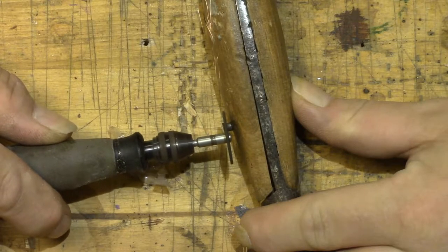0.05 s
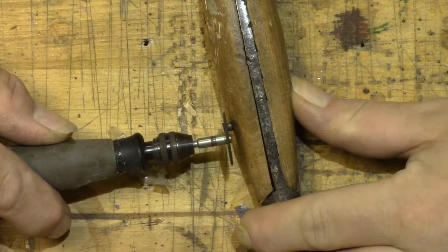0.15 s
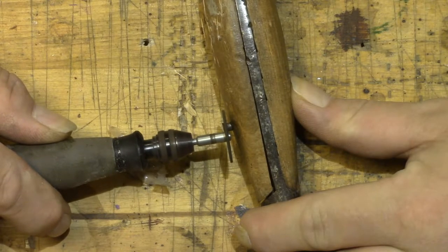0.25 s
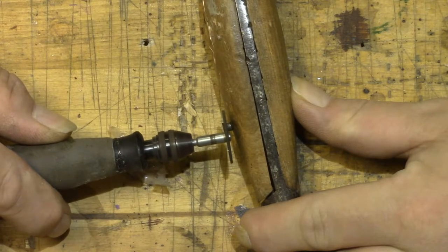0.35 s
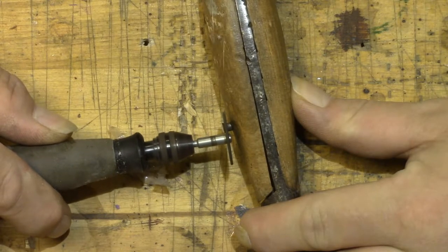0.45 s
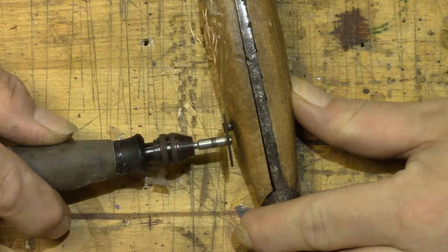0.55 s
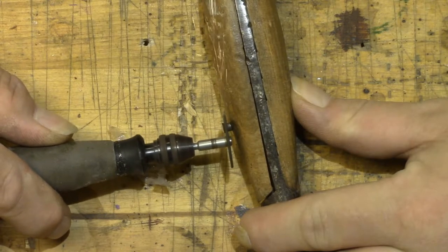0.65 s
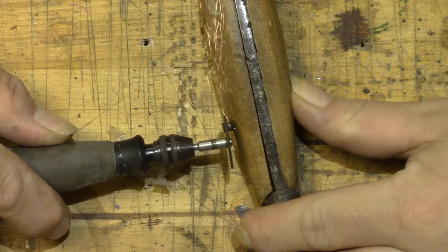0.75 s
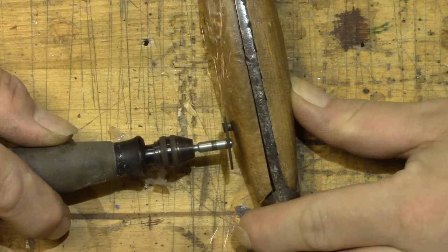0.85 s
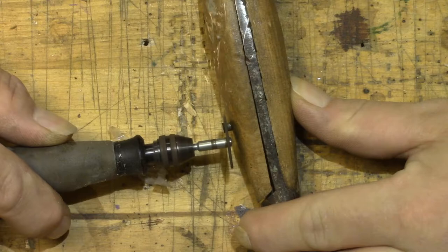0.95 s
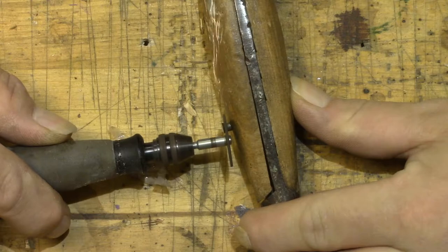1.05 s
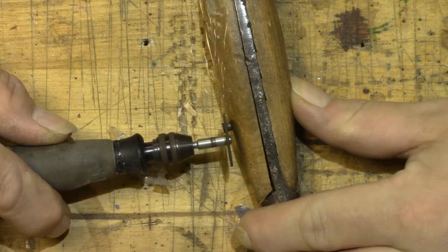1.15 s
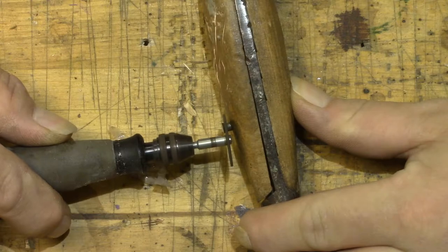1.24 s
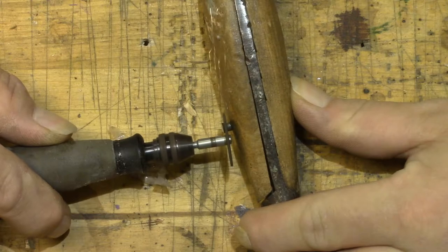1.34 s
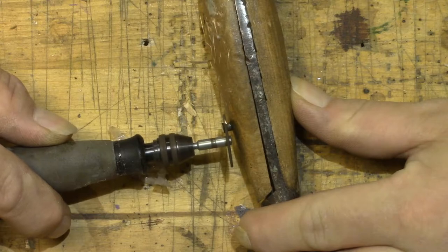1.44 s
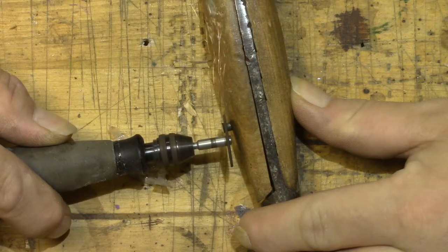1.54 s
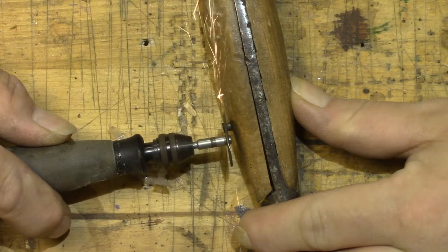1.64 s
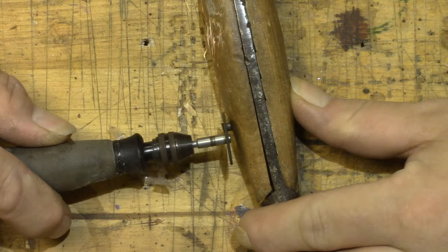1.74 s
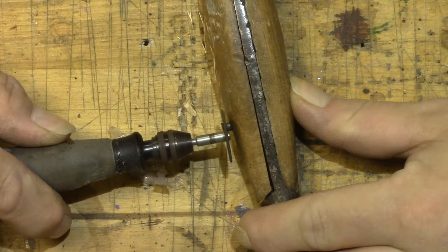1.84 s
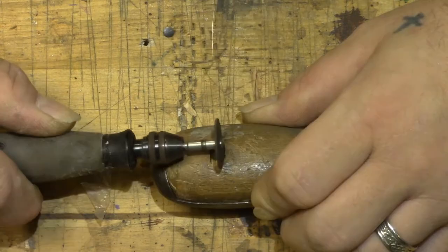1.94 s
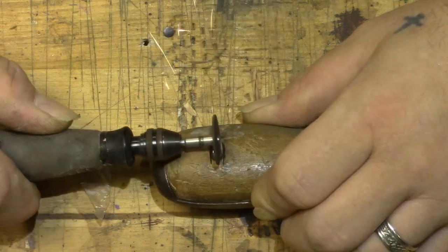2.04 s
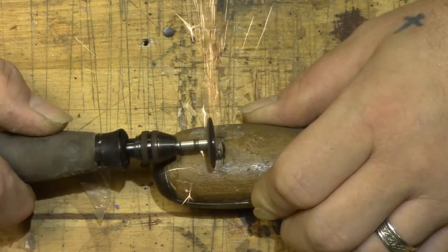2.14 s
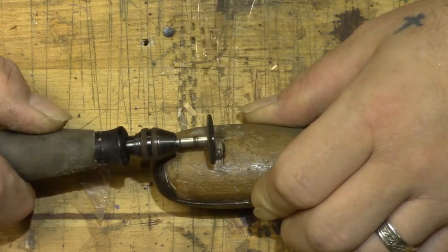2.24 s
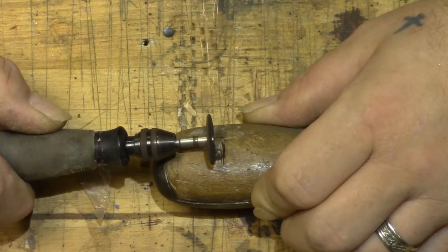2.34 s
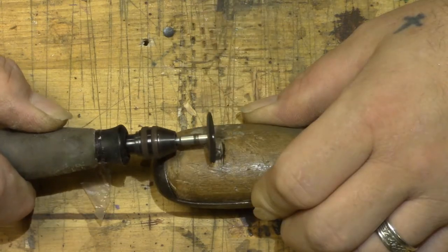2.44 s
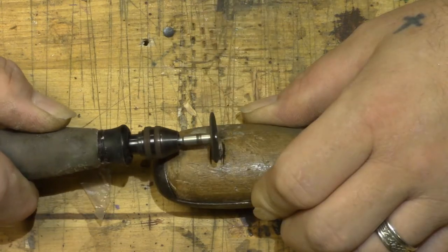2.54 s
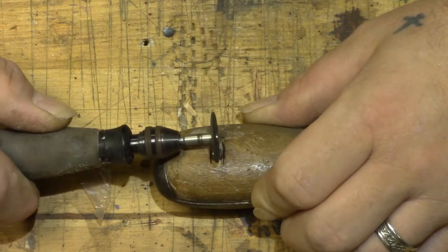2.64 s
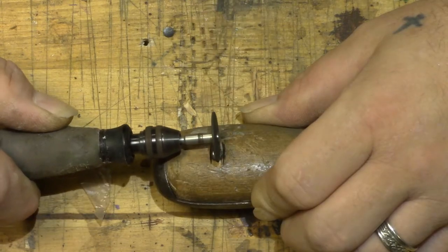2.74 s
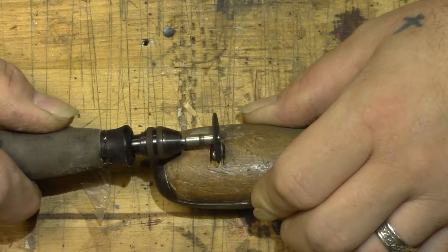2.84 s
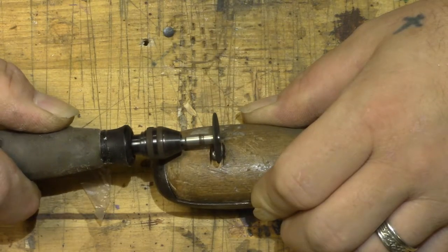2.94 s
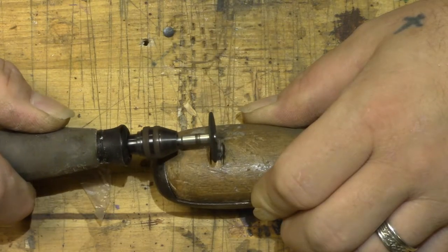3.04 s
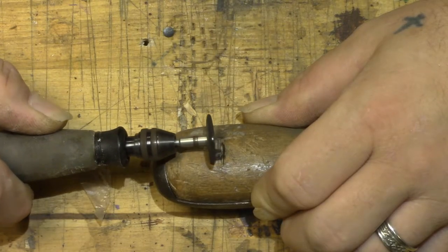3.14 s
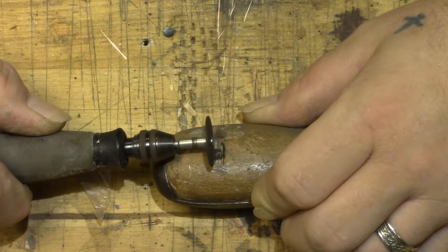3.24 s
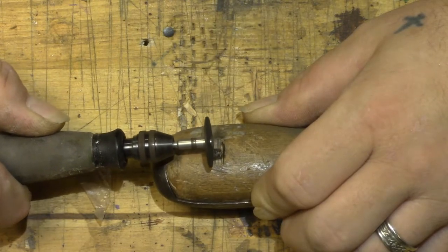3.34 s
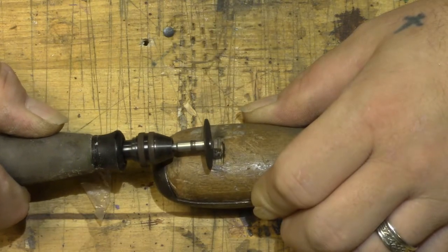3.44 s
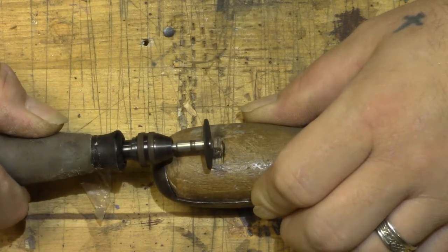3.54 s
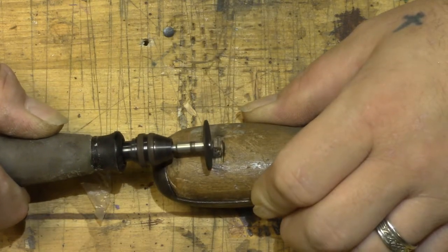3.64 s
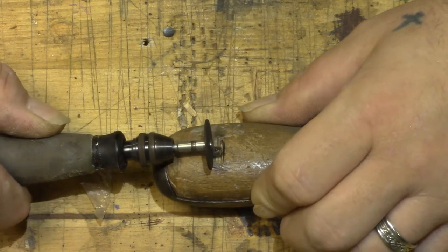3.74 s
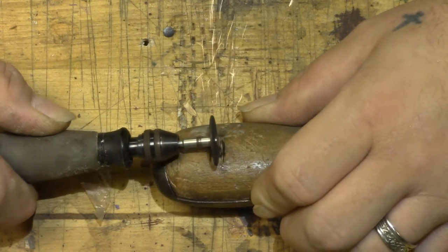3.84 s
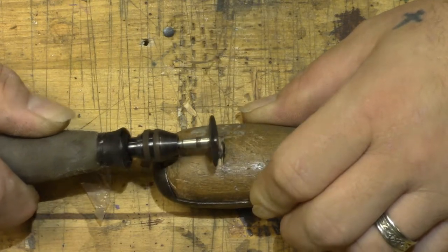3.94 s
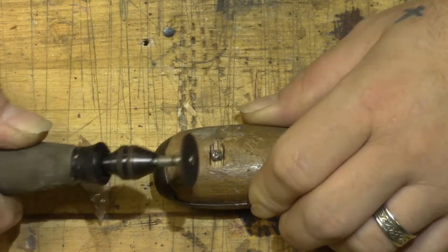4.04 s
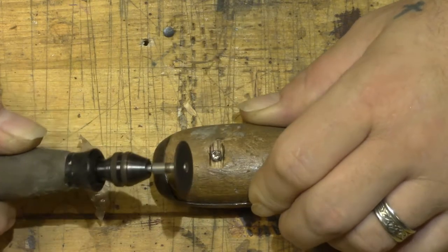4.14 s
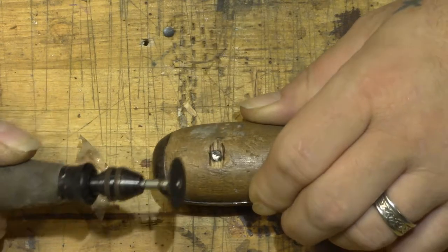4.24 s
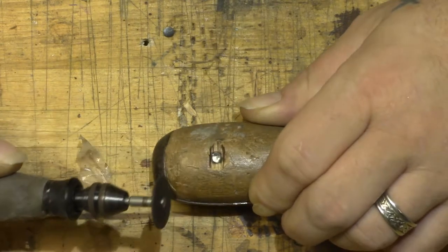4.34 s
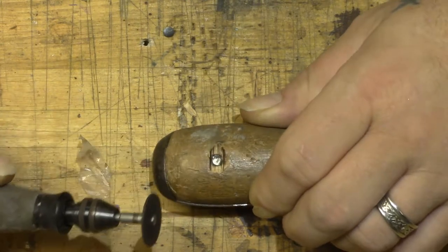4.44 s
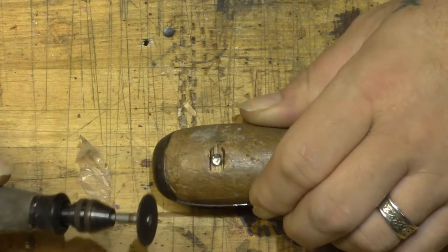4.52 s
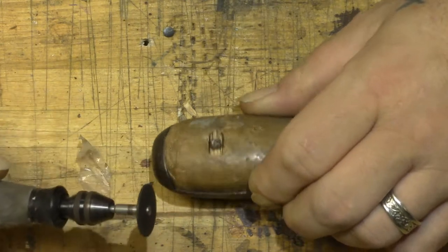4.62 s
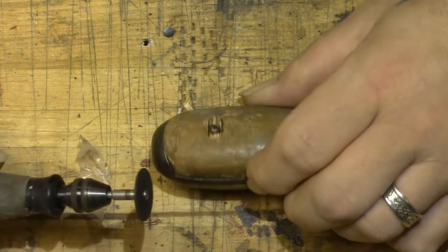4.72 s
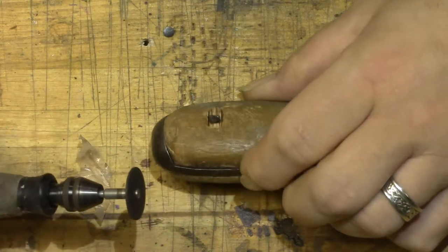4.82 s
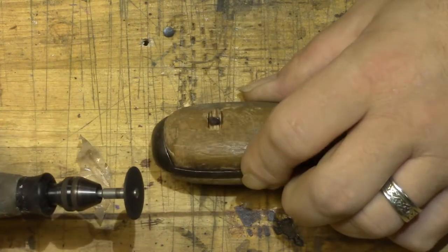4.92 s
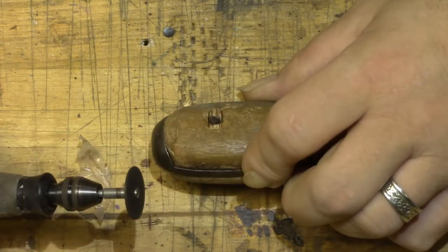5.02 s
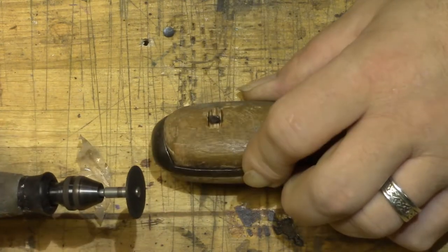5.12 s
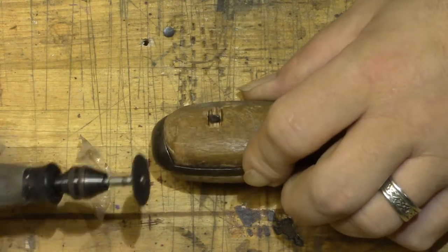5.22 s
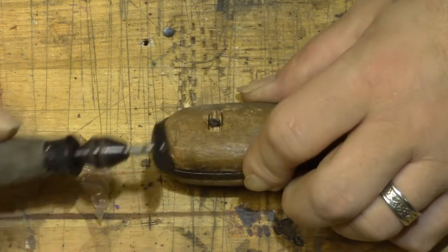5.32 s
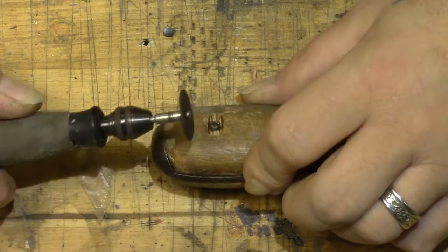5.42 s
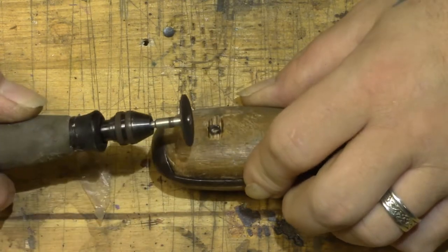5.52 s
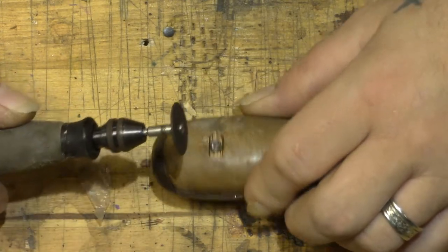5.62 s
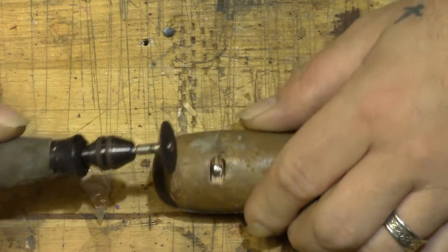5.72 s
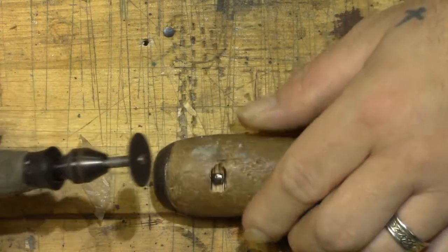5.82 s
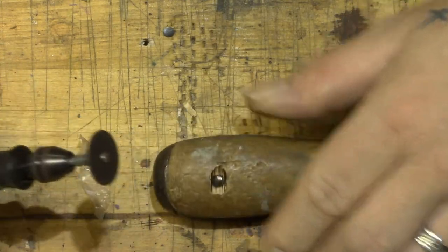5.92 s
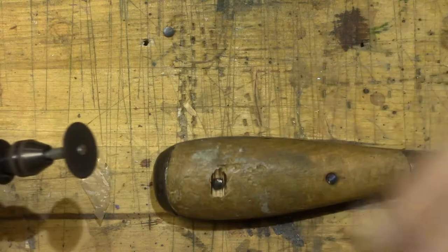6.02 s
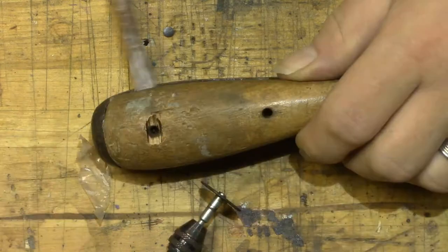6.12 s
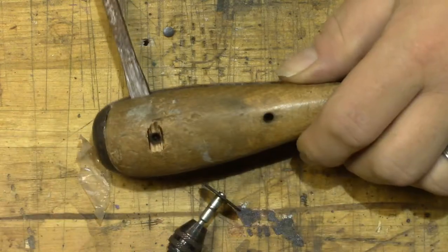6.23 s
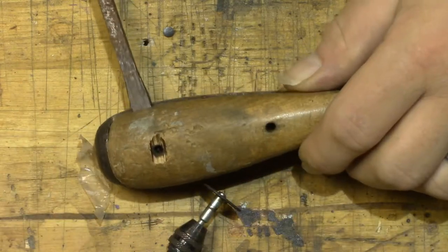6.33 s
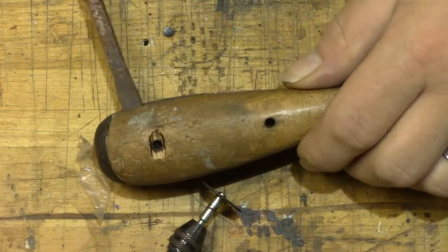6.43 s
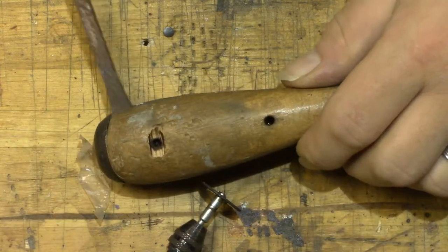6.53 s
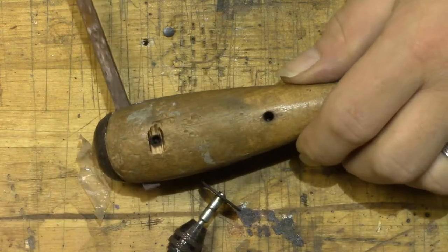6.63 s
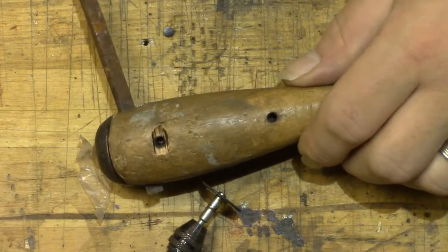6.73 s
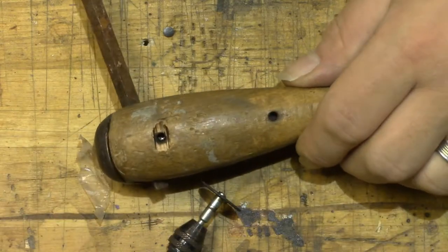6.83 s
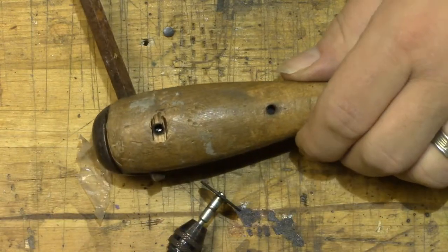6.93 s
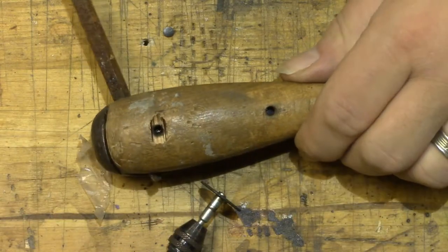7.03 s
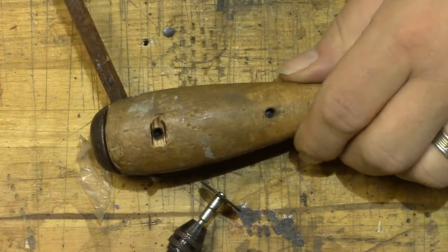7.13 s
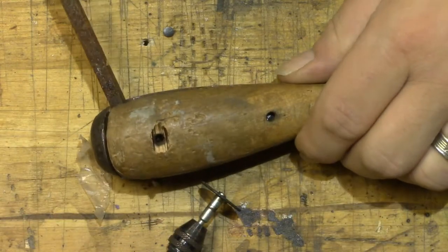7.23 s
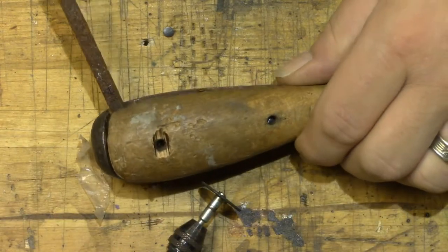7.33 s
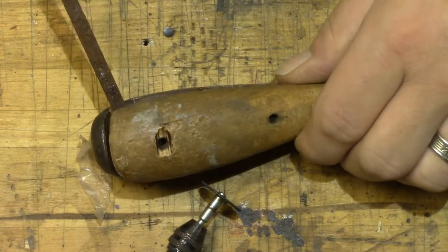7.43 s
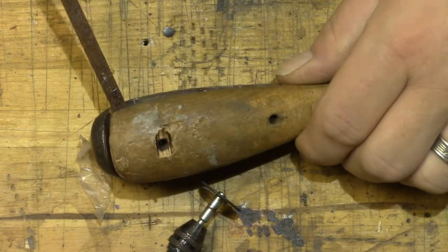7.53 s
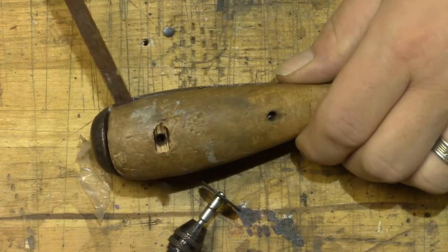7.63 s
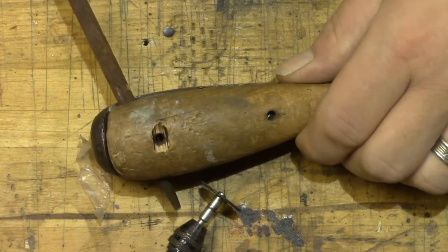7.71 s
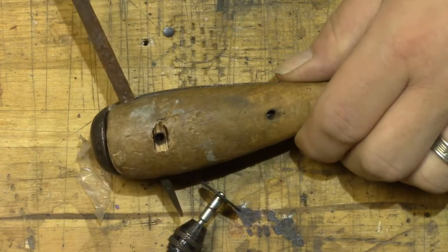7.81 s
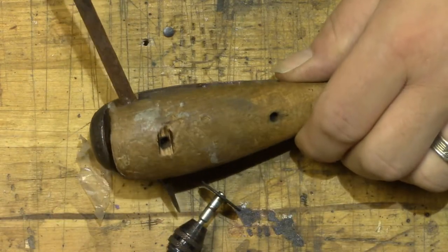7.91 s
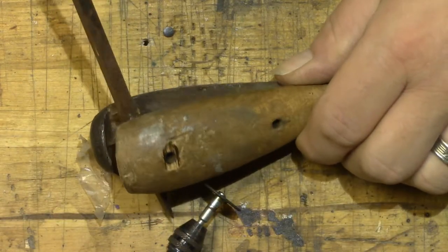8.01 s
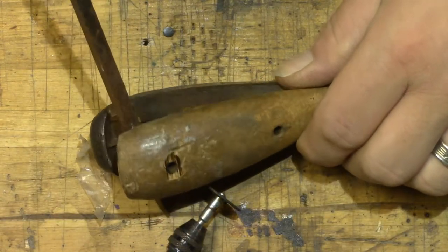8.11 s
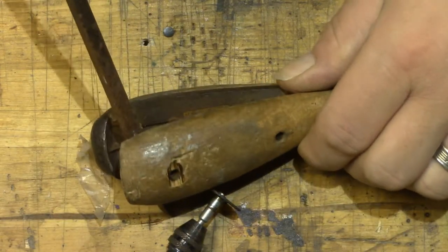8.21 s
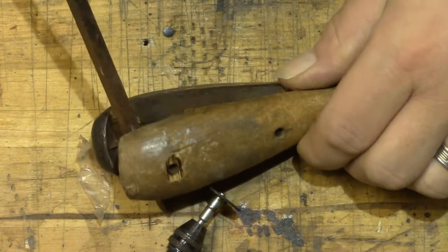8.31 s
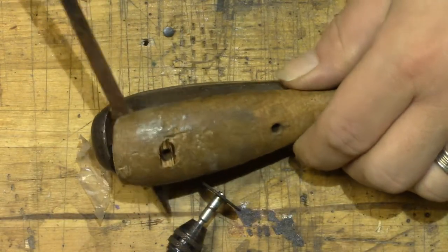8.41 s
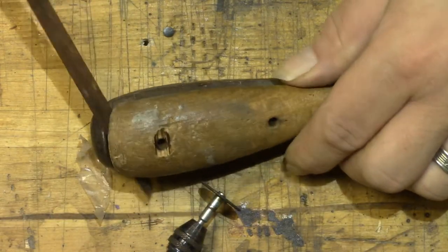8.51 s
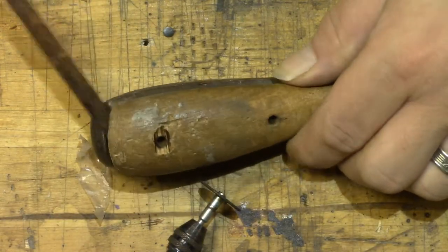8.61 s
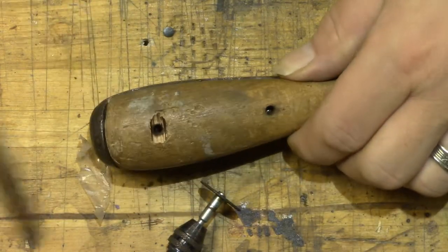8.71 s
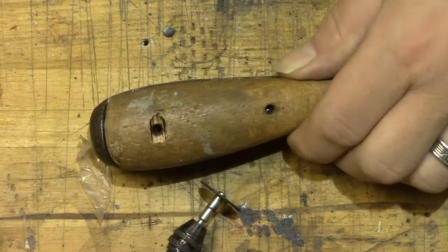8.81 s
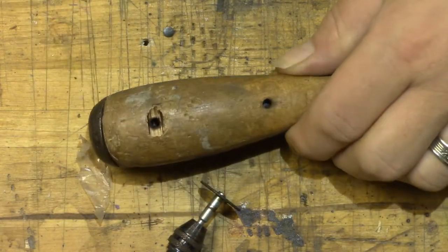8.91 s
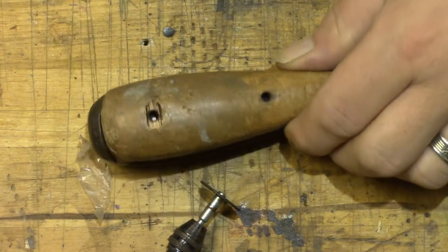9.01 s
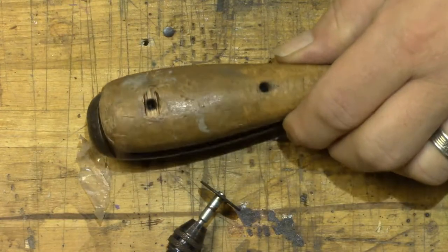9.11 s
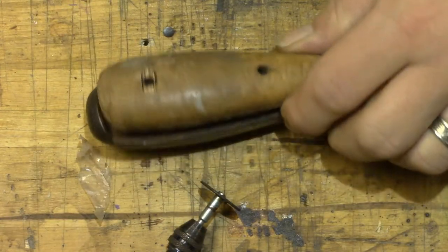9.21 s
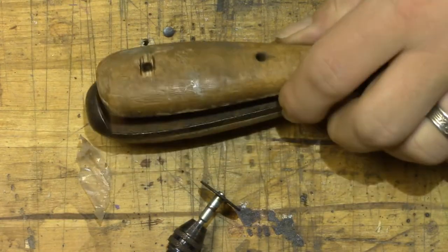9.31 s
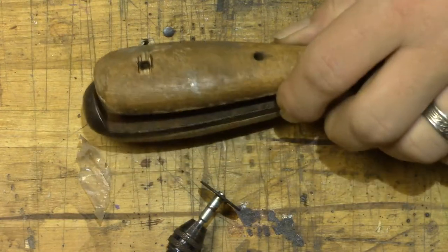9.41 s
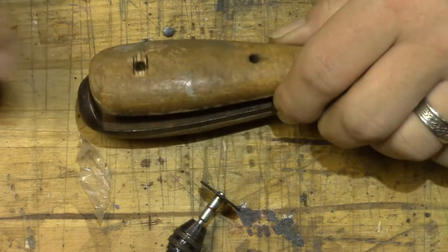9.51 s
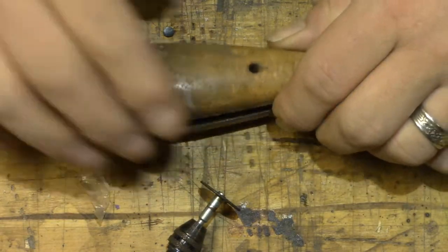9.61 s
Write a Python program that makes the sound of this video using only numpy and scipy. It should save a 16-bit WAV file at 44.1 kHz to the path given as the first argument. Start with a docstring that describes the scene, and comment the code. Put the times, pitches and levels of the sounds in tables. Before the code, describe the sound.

A small rotary tool whines and hisses as it grinds two steel pins, spins free, stops, then woody knocks and metal scrapes follow.

```python
"""A quiet workshop with a wooden bench: a small rotary tool grinds through two steel pins in a wooden handle.
It is lifted, spins free and stops short; then a steel bar pries, scrapes and knocks at the handle.
The tool is built from multiples of its shaft speed plus hissing grit and fan air.
The handling is noisy contact force that sets bench, handle and bar ringing. The sound is the same in both channels."""
import sys
import numpy as np
from scipy import signal
from scipy.fft import rfft, irfft
from scipy.io import wavfile

SR = 44100
rng = np.random.default_rng(int(sys.argv[2]) if len(sys.argv) > 2 else 0)


def master(y):
    """Save y as 16-bit WAV."""
    cut = np.clip(np.atleast_2d(y).T, -1, 1)
    pcm = np.round(cut * 32767)  # scale
    wavfile.write(sys.argv[1], SR, pcm.astype(np.int16))


def volts_from_decibels(level):
    """Turn decibel levels (scalar or array-like) into linear amplitude factors."""
    exponent = np.asarray(level, float) / 20
    return 10 ** exponent


N = 426006      # length in samples
STOP_S = 6.065  # the tool falls silent and the handling begins

# once-a-turn hum of the shaft, wavering with the grip: start_s [s], level_db [dB]
HUM = [(0, -51), (.15, -56), (.39, -43), (.48, -52.5), (.6, -44), (.9, -44), (1.15, -51.5), (1.78, -46),
       (1.98, -35.5), (2.1, -49), (2.21, -35.5), (2.35, -43.5), (2.8, -36.5), (3.22, -54.5), (3.6, -39.5),
       (3.85, -52.5), (4.5, -39.5), (4.95, -51.5), (6.06, -46)]
# ringing tones of the bench, the wooden handle and the steel bar:
# pitch_hz [Hz], relative level_db [dB], time to fall by 60 dB t60_s [s]
BENCH = [(248, -3, 0.078), (270, -13, 0.1), (335, -4, 0.062), (400, 7, 0.038), (470, -3.5, 0.027)]
WOOD = [(566, -2.5, 0.015), (658, -3.5, 0.033), (873, -3, 0.022), (1061, -1, 0.024), (1353, 2.5, 0.015),
        (1847, -7.5, 0.039), (2093, 0.5, 0.014), (2604, -27, 0.026)]
STEEL = [(3650, -9, .06), (3950, -8, .05), (4450, -1, .05), (4620, -4, .05), (4786, -1, .09),
         (5950, -12, .06), (6640, -13, .06), (7950, -15, .05), (8950, -11, .07), (10800, -18, .05),
         (14150, -19, .08)]


def rms_one(x):
    """Scale to unit power."""
    return x / np.sqrt(np.mean(x ** 2) + 1e-20)


def in_time(rows, at):
    """Columns of a table at the given samples, joined by straight lines."""
    s, *columns = np.transpose(rows)
    return [np.interp(at / SR, s, c) for c in columns]


def drift(rate_hz, size):
    """Random wandering of spread 1: noise with everything much faster than rate_hz smoothed away."""
    r = np.exp(-128 * np.pi * rate_hz / SR)   # one value every 64 samples
    noise = rng.standard_normal(size // 64 + 502)
    slow = signal.lfilter([1], [1, -2 * r, r * r], noise)[500:]   # skip the filter's start
    return np.interp(np.arange(size) / 64, np.arange(len(slow)), rms_one(slow - slow.mean()))


def band(x, low_hz, high_hz, order=2):
    """Keep only the sound between two pitches."""
    return signal.sosfilt(signal.butter(order, [low_hz, high_hz], "band", fs=SR, output="sos"), x)


def coloured(spectrum, size):
    """Noise of the given spectrum, unit power."""
    hz, db = np.transpose(spectrum)
    bins = np.maximum(np.fft.rfftfreq(size, 1 / SR), 1)
    gain = volts_from_decibels(np.interp(np.log(bins), np.log(hz), db))
    return rms_one(irfft(rfft(rng.standard_normal(size)) * gain, size))


def resonate(x, hz, width_hz):
    """One resonance, with gain 1 at its peak."""
    r = np.exp(-np.pi * width_hz / SR)
    poles = [1, -2 * r * np.cos(2 * np.pi * hz / SR), r * r]
    return signal.lfilter(np.array([1, 0, -1]) * (1 - r * r) / 2, poles, x)


def swell(start, length, rise, fall, at):
    """Rise, hold and fall of one event, 0-1 (times in s)."""
    t = at / SR - start
    return np.clip(t / rise, 0, 1) * np.clip((length + fall - t) / fall, 0, 1) ** 2


def motor():
    """Fan air rushes all along; whistle and motor tones stand out once the wheel is free."""
    # fan whistle: start_s [s], level_db [dB]
    whistle = [(3.97, -42), (4.15, -37.5), (4.22, -28), (4.6, -29.5), (4.75, -42), (5.2, -32.5), (5.4, -41),
               (5.65, -42.5), (6.06, -71)]
    # free-running motor and bearings: multiple of shaft speed [ratio], level_db [dB rms]
    motor_tones = [(1.25, -64), (2, -46), (2.999, -42.5), (4.09, -48), (7.19, -50), (8.27, -52.5)]
    # colour of the fan air: pitch_hz [Hz], relative level_db [dB per Hz]
    air_colour = [(90, -45.5), (150, -20), (400, -9), (770, -12), (1000, -3.5), (1450, 2), (2400, 0.5),
                  (3100, -6), (3800, -3.5), (4250, -4.5), (4700, -1), (5500, -4.5), (7500, -1.5),
                  (9300, -4.5), (11000, -8.5), (16000, -12)]
    lift_s, loaded_hz, free_hz, spin_up_s = 3.95, 7480, 8380, .38   # whistle climbs as the load comes off
    fan_blades = 18
    air_loaded_db, air_free_db = -36, -33
    settle_s = 0.23   # motor tones grow as the shaft settles

    at = np.arange(round(STOP_S * SR))
    since = at / SR - lift_s
    whistle_hz = free_hz - (free_hz - loaded_hz) * np.exp(-np.maximum(since, 0) / spin_up_s)
    whistle_db, = in_time(whistle, at)
    hum_db, = in_time(HUM, at)
    shaft_hz = whistle_hz / fan_blades * (1 + 0.00038 * drift(27, len(at)))
    angle = 2 * np.pi * np.cumsum(shaft_hz) / SR
    tones = volts_from_decibels(whistle_db + 1.3 * drift(16.5, len(at))) * np.sin(fan_blades * angle)
    tones += volts_from_decibels(hum_db) * np.sin(angle)
    settled = np.clip(since / settle_s, 0, 1)
    for multiple, db in motor_tones:
        level = volts_from_decibels(db + 1.8 * drift(3.1, len(at)) + 1.9 * drift(10.6, len(at)))
        tones += settled * level * np.sin(multiple * angle)
    free = np.clip(since / 0.017 + .5, 0, 1)   # 0 under load, 1 once lifted
    air_db = air_loaded_db + free * (air_free_db - air_loaded_db) + 0.67 * drift(45, len(at))
    out = np.zeros(N)
    out[at] = np.sqrt(2) * free * tones + volts_from_decibels(air_db) * coloured(air_colour, len(at))
    return out


def uneven_rim(angle):
    """The wheel's uneven rim repeats every turn, so multiples of the speed sound, each wavering as it wears."""
    wear_db, wear_hz = 2.5, 2           # spread and pace of the slow swell
    flutter_db, flutter_hz = 4.5, 12    # spread and pace of the quick flutter
    fine = 14   # multiples below this come from the coarse rim shape and change less
    size = len(angle)
    rim = np.zeros(size)
    for k in range(3, 43):
        waver_db = wear_db * drift(wear_hz, size) + flutter_db * drift(flutter_hz, size)
        slip = 6.0 * rng.random() + 0.35 * drift(35, size)
        rim += volts_from_decibels(min(k / fine, 1) * waver_db) * np.sin(k * angle + slip)
    return rim


def squeals(angle, at, begin_s, end_s):
    """A sharp resonance of wheel or pin picks out nearby multiples and squeals while the grip favours it."""
    # squeals: start_s [s], length_s [s], pitch_hz [Hz], level_db [dB]
    squeal_rows = [(-.03, 0.35, 4280, -32), (.03, 0.82, 818, -52), (.4, 0.2, 4910, -37),
                   (0.155, 0.17, 2760, -34.5), (0.276, 0.23, 7275, -29), (0.474, 0.17, 6100, -35),
                   (0.567, 0.25, 4330, -35), (.82, .13, 3920, -31.5), (0.856, 0.3, 7380, -27.5),
                   (0.985, 0.46, 3990, -37.5), (1.238, 0.34, 7200, -30), (1.27, .5, 3930, -37),
                   (1.34, .33, 4380, -29), (1.547, 0.19, 8410, -28), (1.704, 0.19, 7480, -28),
                   (1.82, 0.099, 4780, -25.5), (1.83, 0.096, 1857, -33), (1.953, 0.093, 8880, -26),
                   (2.053, 0.19, 1930, -30), (2.034, .19, 4790, -30), (2.126, 0.11, 4090, -29),
                   (2.327, 0.1, 2030, -31.5), (2.305, 0.12, 4960, -38), (2.3, 0.69, 3144, -39),
                   (2.513, 0.39, 3900, -43), (2.531, .19, 1970, -33), (2.6, .2, 6970, -46),
                   (2.756, 0.19, 2000, -34.5), (2.77, 0.31, 7300, -38.5), (3.047, 0.061, 4860, -26),
                   (3.23, .23, 5020, -35.5), (3.337, 0.1, 7380, -34.5), (3.444, 0.48, 1663, -40),
                   (3.732, 0.098, 7340, -35), (3.76, 0.14, 4760, -32)]
    width_hz, rise_s, fall_s = 280, .035, .06
    steady = sum(np.sin(k * angle + k * k) for k in range(2, 26))
    out = np.zeros(len(at))
    for start, length, hz, db in squeal_rows:
        if begin_s <= start + length < end_s:
            shape = swell(start, length, rise_s, fall_s, at)
            on = shape > 0
            tone = resonate(resonate(steady[on], hz, width_hz), hz, width_hz)
            out[on] += volts_from_decibels(db + 2.7 * drift(33, len(at))[on]) * shape[on] * rms_one(tone)
    return out


def bearing_buzz(angle):
    """A loaded bearing buzzes: two side tones around the eighth multiple of the shaft speed."""
    beat, peak_db = .306, -43   # distance of each side tone in multiples of shaft speed, level
    return sum(volts_from_decibels(peak_db + 0.78 * drift(7.7, len(angle))) * np.sin(side * angle)
               for side in (8 - beat, 8 + beat))


def cutting(turns, rows, resonances, bands, grit_db, wobble):
    """Rim and torn-off grit drive the resonances of wheel, pin and handle; pressure sets the level."""
    begin_s, end_s = rows[0][0], rows[-1][0]
    at = np.arange(round(begin_s * SR), round(end_s * SR))
    speed, = in_time(turns, at)
    cut_db, = in_time(rows, at)
    hum_db, = in_time(HUM, at)
    low_db, top_db = (db + share * (cut_db - cut_db.mean()) for db, share in bands)
    angle = 2 * np.pi * np.cumsum(speed * (1 + wobble * drift(25, len(at)))) / SR
    # torn-off grit hisses, strongest where the high spot bites
    grit = rng.standard_normal(len(at)) * (1 + .5 * np.sin(angle))
    bite = rms_one(uneven_rim(angle)) + volts_from_decibels(grit_db) * rms_one(grit)
    rung = bite + sum(volts_from_decibels(db) * resonate(bite, hz, width) for hz, width, db in resonances)
    sound = np.zeros(len(at))
    for low, high, db in (1100, 3400, low_db), (3400, 9600, cut_db), (9600, 16500, top_db):
        sound += volts_from_decibels(db - 2.0) * rms_one(band(rung, low, high, order=3))
    sound += np.sqrt(2) * volts_from_decibels(hum_db) * np.sin(angle)
    sound += volts_from_decibels(-59 + 3.7 * drift(3.9, len(at))) * np.sin(2 * angle)
    sound += squeals(angle, at, begin_s, end_s) + bearing_buzz(angle)
    # the handle shudders on the bench
    sound += volts_from_decibels(hum_db - 17.5) * rms_one(band(grit, 250, 279))
    out = np.zeros(N)
    out[at] = sound
    return out


def two_pins():
    """The pins are cut one after the other, each with its own speed, pressure and resonances."""
    # shaft speed, one table per pin: start_s [s], speed_hz [turns per s]
    speeds = [
        [(0, 432), (.19, 422.4), (.51, 409.5), (.742, 399), (.95, 382.7), (1.104, 385), (1.218, 382),
         (1.42, 390.8), (1.5, 391), (1.73, 385.1), (1.855, 387.2)],
        [(1.86, 374.1), (2.04, 375.2), (2.11, 381.7), (2.26, 380.7), (2.42, 392.6), (2.5, 393.8), (2.75, 387.4),
         (2.89, 386.7), (2.99, 389), (3.14, 406.1), (3.33, 407.4), (3.49, 411.1), (3.84, 405.8), (3.96, 415)],
    ]
    # pressure of the wheel on the steel, one table per pin: start_s [s], relative level_db [dB]
    cuts = [
        [(0, -26), (.15, -29), (.2, -26), (.46, -26.5), (.85, -24.5), (.89, -22.5), (1.08, -25.5),
         (1.22, -26.5), (1.3, -24.5), (1.72, -23.5), (1.79, -29), (1.855, -26.5)],
        [(1.86, -24), (2, -23.5), (2.15, -26), (2.33, -23.5), (2.45, -32.5), (2.77, -35.5), (2.81, -31),
         (3, -28.5), (3.1, -39.5), (3.14, -24), (3.47, -27.5), (3.52, -31.5), (3.7, -33), (3.74, -21.5),
         (3.91, -30.5), (3.95, -42.5)],
    ]
    # wheel, pin and handle resonances, one table per pin: pitch_hz [Hz], width_hz [Hz], gain_db [dB]
    work = [
        [(1640, 82, 8), (4100, 1800, 6.5), (6100, 400, 7.5), (7580, 1300, 18), (8280, 520, 10.5),
         (10680, 530, 9.5), (12360, 660, 13), (14700, 900, 15)],
        [(1577, 77, 3), (2986, 150, 0.5), (6390, 130, 4), (7393, 62, 12), (9300, 1600, -3), (12800, 1000, 4.5),
         (14560, 790, 8)],
    ]
    # low and top band of each cut: relative level_db at mean pressure [dB],
    # share of the pressure's swing that it follows [ratio]
    low_and_top = [
        [(-32, .1), (-25.5, .4)],
        [(-34, .1), (-37.5, 1.1)],
    ]
    return sum(cutting(*pin, grit_db=-10, wobble=.0006) for pin in zip(speeds, cuts, work, low_and_top))


def room_hush():
    """The quiet room: steady noise, strongest in the deep bass."""
    # colour of the hush: pitch_hz [Hz], relative level_db [dB per Hz]
    hush_colour = [(12, -24), (20, 4), (55, 2.5), (123, 2), (187, -15.5), (367, -6.5), (542, -23.5),
                   (1090, -26.5), (1220, -25.5), (4670, -32.5), (14700, -36.5), (16000, -37)]
    return volts_from_decibels(-60) * coloured(hush_colour, N)


def bench_rumble():
    """Hands shifting weight on the bench: swaying low noise."""
    # rumble: start_s [s], level_db [dB]
    rumble_rows = [(6.1, -75), (7.9, -73), (8.15, -60.5), (8.4, -75), (9, -59), (9.66, -64)]
    level_db = in_time(rumble_rows, np.arange(N))[0] + 3 * drift(4.0, N)
    return volts_from_decibels(level_db) * rms_one(band(rng.standard_normal(N), 30, 110))


def ring(modes, excite):
    """The contact force sets every mode of a body ringing."""
    out = np.zeros(N)
    for hz, db, t60 in modes:
        r, w = volts_from_decibels(-60 / (t60 * SR)), 2 * np.pi * hz / SR
        force = excite * rng.standard_normal(N) + 1e-18   # rough contact: every mode is pushed differently
        out += signal.lfilter([0, volts_from_decibels(db) * np.sin(w)], [1, -2 * r * np.cos(w), r * r], force)
    return out


def joint(x):
    """Dry roughness coloured by the joint between bar and handle."""
    # broad resonances of the joint: pitch_hz [Hz], width_hz [Hz], gain_db [dB]
    joint_rows = [(2050, 250, 5), (2620, 170, 7), (2880, 160, 2.5), (3900, 290, 4.5), (5550, 400, 4)]
    return x + sum(volts_from_decibels(db) * resonate(x, hz, width) for hz, width, db in joint_rows)


def scrape(per_s, unevenness_db):
    """Dense small slips ring bench, handle and bar; some roughness is heard directly."""
    # strokes of rubbing and prying: start_s [s], length_s [s],
    # wood level_db [dB], dry rasp level_db [dB], bar level_db [dB]
    strokes = [(6.066, 0.029, -51, -78, -62), (6.394, 0.082, -58, -66.5, -66), (6.474, .03, -55, -68, -68),
               (6.522, 0.03, -51, -72, -54.5), (6.605, 0.057, -69, -71, -77), (6.748, 0.057, -64, -55, -73),
               (6.999, 0.054, -70, -68.5, -89), (7.177, 0.068, -74, -79.5, -89),
               (7.323, 0.061, -72, -78, -79), (7.636, 0.13, -59, -62, -72), (7.818, 0.047, -71.5, -73, -86),
               (7.94, 0.047, -69, -80, -90), (8.042, 0.035, -86, -82, -82), (8.4, 0.1, -62.5, -71.5, -77),
               (8.452, 0.092, -55.5, -56.5, -61), (8.539, 0.12, -55.5, -61, -59),
               (8.993, 0.058, -54, -73, -80), (9.068, 0.079, -66, -75, -78),
               (9.195, 0.053, -67.5, -81.5, -90), (9.41, 0.037, -74.5, -89.5, -94.5)]
    rise_s, fall_s = 0.033, 0.049
    fidget_db = -83   # faint rubbing between the strokes
    raw_db = -11      # part of the rubbing heard without the wood's resonances

    start = round(STOP_S * SR)
    after = np.arange(start, N)
    levels = np.zeros((3, N))   # wood, rasp, bar
    levels[:, after] = volts_from_decibels(fidget_db + np.array([[0], [-6], [-12]]))
    for start_s, length_s, *db in strokes:
        levels[:, after] += np.outer(volts_from_decibels(db), swell(start_s, length_s, rise_s, fall_s, after))
    slip_db = unevenness_db * np.minimum(rng.exponential(1, N), 4) + 3.0 * drift(30, N)
    slips = (rng.random(N) < per_s / SR) * volts_from_decibels(slip_db)
    slips[:start] = 0
    grain = slips * rng.standard_normal(N)
    wood = rms_one(ring(WOOD, slips)) + volts_from_decibels(-1.0) * rms_one(ring(BENCH, slips))
    wood += volts_from_decibels(raw_db) * rms_one(band(grain, 300, 3240, order=3))
    rasp = rms_one(joint(band(grain, 1370, 5900)))
    return levels[0] * rms_one(wood) + levels[1] * rasp + levels[2] * rms_one(ring(STEEL, slips))


def soften(x):
    """Wood yields: its contact force holds little above 1900 Hz."""
    return signal.sosfilt(signal.butter(2, 1900, fs=SR, output="sos"), x)


def knocks():
    """Each contact crumbles for a few ms, ringing bench, handle and bar, with a dry crack on top."""
    # the handle set down or bumped on the bench: start_s [s],
    # relative levels of bench_db [dB], handle_db [dB], crack_db [dB]
    bumps = [(6.179, -43, -33.5, -39.5), (6.203, -41.5, -36, -43), (6.487, -36, -40, -38.5),
             (6.598, -42, -57, -63), (7, -62, -55, -55), (7.035, -55, -50, -46), (7.064, -35.5, -66, -68),
             (7.309, -55, -41.5, -47), (7.369, -46, -48.5, -57), (8.134, -53, -68, -75.5),
             (8.342, -33, -43.5, -62), (8.762, -32, -25, -38), (8.914, -37.5, -31, -46),
             (8.993, -36, -34.5, -49.5), (9.166, -23, -20.5, -68), (9.184, -23.5, -25, -51),
             (9.6, -28, -28.5, -80), (9.615, -37.5, -32, -82)]
    # the steel bar catches on the handle: start_s [s],
    # relative levels of handle_db [dB], crack_db [dB], bright tick_db [dB], bar_db [dB]
    catches = [(6.081, -38, -43, -53, -57), (6.145, -43.5, -58, -63, -69), (6.412, -31, -37.5, -47, -44),
               (6.637, -40, -57, -54, -59), (6.707, -43, -51, -47, -64), (6.755, -54, -46, -36, -46),
               (6.764, -31, -20.5, -31, -37), (7.61, -45.5, -51, -51, -60), (7.626, -54.5, -67.5, -43, -64),
               (7.638, -50, -63, -43, -63), (7.658, -38, -42, -35, -69), (8.487, -32, -31.5, -60, -50),
               (8.673, -36, -37.5, -36.5, -36)]
    bump_tick_db = -21    # bright tick of a bump, against its crack
    catch_bench_db = -4   # bench under a catch, against the handle
    contact_s = 0.00088   # time for the force to build up

    rows = [(s, bench, handle, crack, crack + bump_tick_db, -np.inf) for s, bench, handle, crack in bumps]
    rows += [(s, handle + catch_bench_db, handle, crack, tick, bar)
             for s, handle, crack, tick, bar in catches]
    s, bench_db, handle_db, crack_db, tick_db, steel_db = np.transpose(rows)

    def dying(db, t60):
        """Envelope that rises quickly at each knock and dies away."""
        clicks = np.full(N, 1e-18)
        clicks[(s * SR).astype(int)] = volts_from_decibels(db)
        fall = signal.lfilter([1], [1, -volts_from_decibels(-60 / (t60 * SR))], clicks)
        rise = np.exp(-1 / (contact_s * SR))
        return signal.lfilter([1 - rise], [1, -rise], fall)

    bench = ring(BENCH, dying(bench_db - 22, 0.014))
    handle = ring(WOOD, dying(handle_db - 22.5, 0.017))
    bar = ring(STEEL, dying(steel_db - 17.0, 0.027))
    crack = joint(band(dying(crack_db + 0.5, 0.039) * rng.standard_normal(N), 1750, 5150))
    tick = band(dying(tick_db + 0.5, 0.051) * rng.standard_normal(N), 5400, 13000, order=1)
    return soften(bench + handle) + bar + crack + tick


def shop(x):
    """Short dull reverberation: dying noise as the echo pattern."""
    t60_s = 0.16
    t = np.arange(round(.4 * SR)) / SR
    echoes = band(rng.standard_normal(len(t)), 170, 5000, order=1)
    echoes *= volts_from_decibels(-60 * t / t60_s) * (t > .004)
    return signal.fftconvolve(x, echoes / np.sqrt(np.sum(echoes ** 2)))[:N]


def scene():
    """Tool first, then the handling with its echoes, over the hush of the room."""
    tool = motor() + two_pins()
    handling = bench_rumble() + scrape(per_s=5000, unevenness_db=2.8) + knocks()
    mono = tool + handling + volts_from_decibels(-8.5) * shop(handling) + room_hush()
    return np.array([mono, mono])


def low_pass(x):
    """Removes everything above the highest recorded frequency."""
    return signal.sosfilt(signal.butter(12, 17040, fs=SR, output="sos"), x)


def record(dry):
    """A steep filter removes the top of the treble, above 15750 Hz."""
    steep = signal.ellip(12, .1, 80, 15750, fs=SR, output="sos")
    mix = signal.sosfilt(steep, dry)
    return low_pass(mix)


dry = scene()
out = record(dry)
master(out)
```